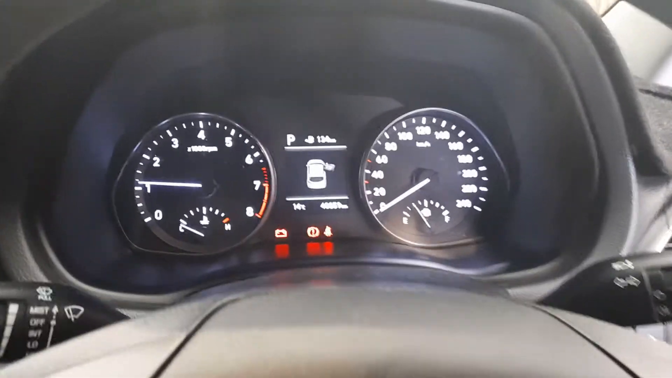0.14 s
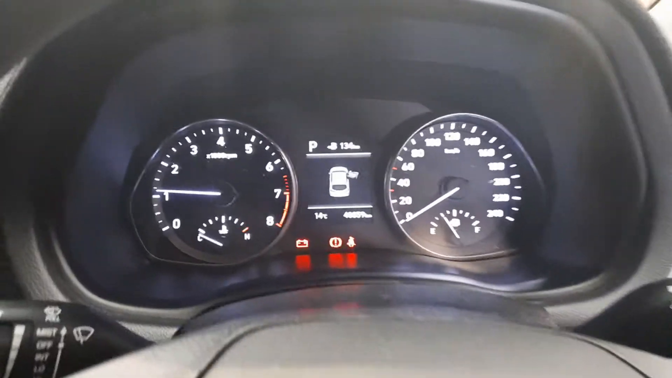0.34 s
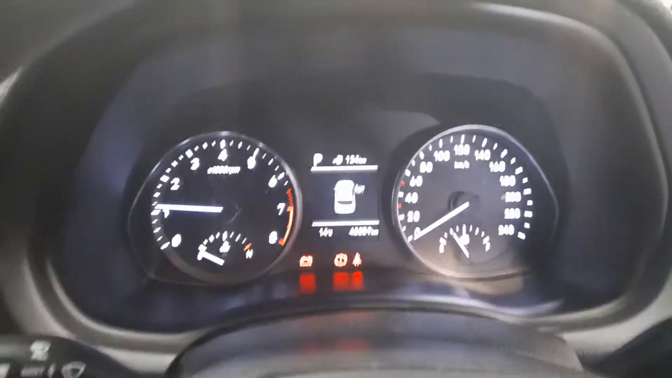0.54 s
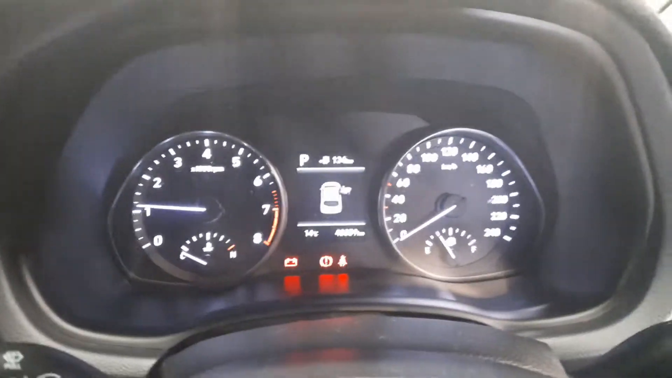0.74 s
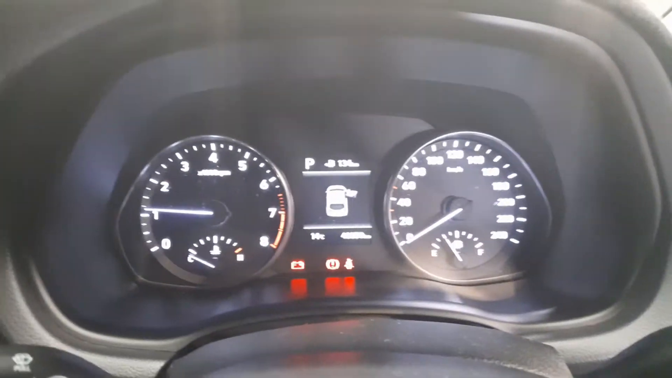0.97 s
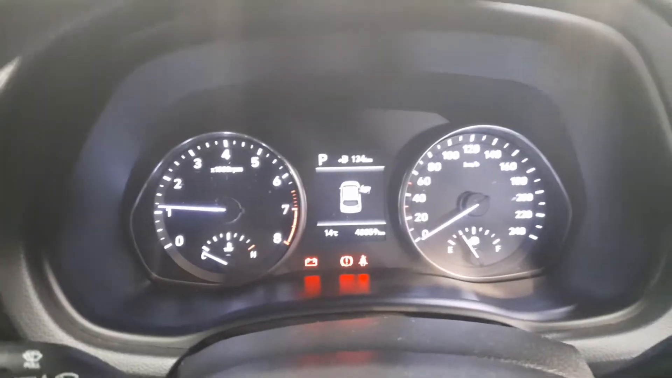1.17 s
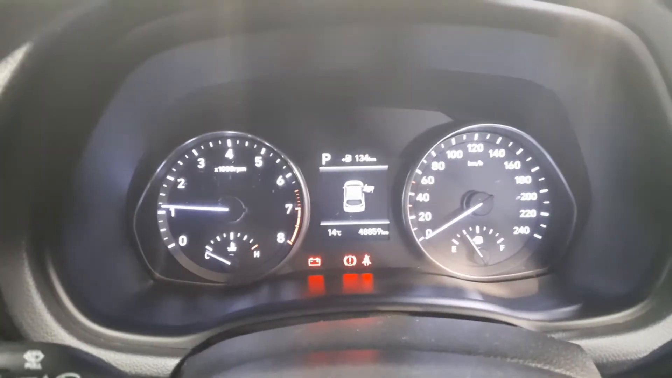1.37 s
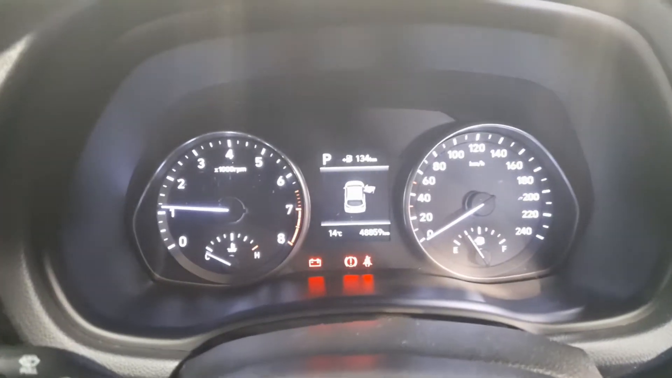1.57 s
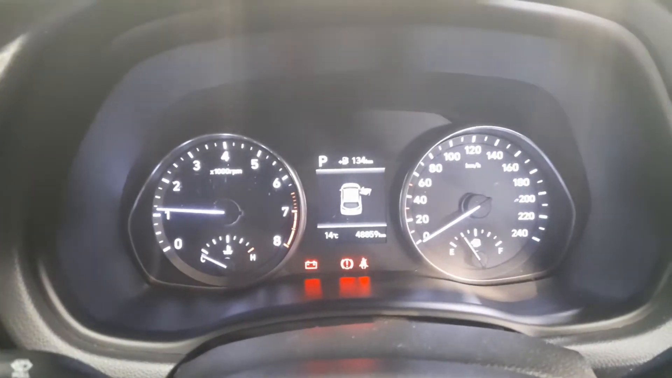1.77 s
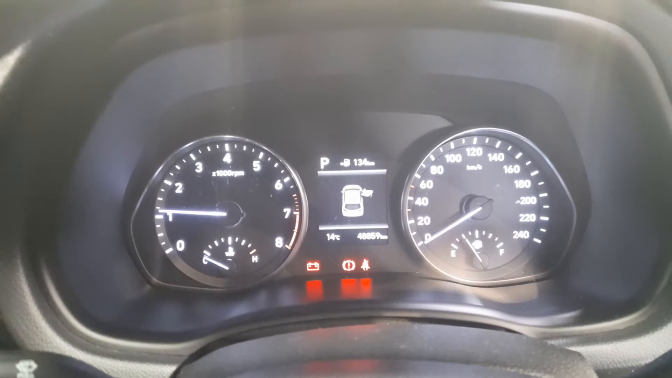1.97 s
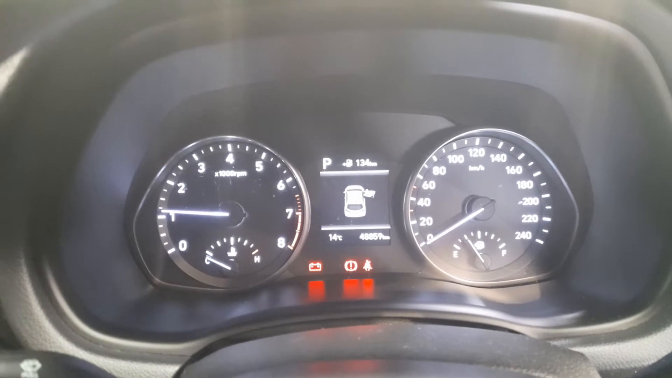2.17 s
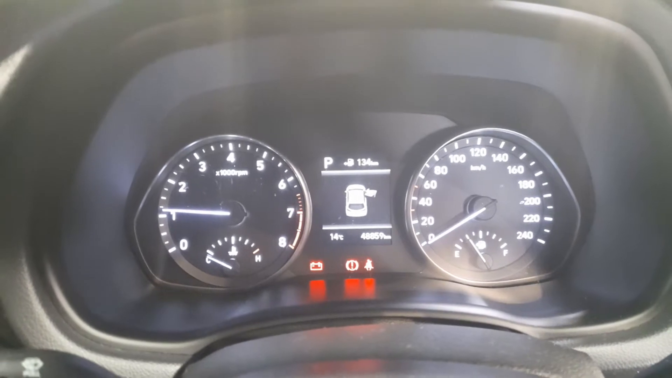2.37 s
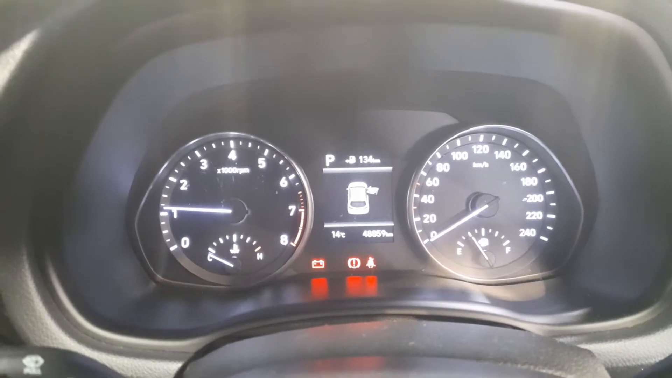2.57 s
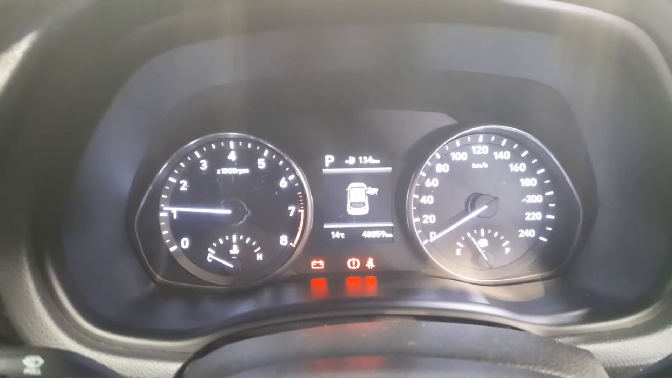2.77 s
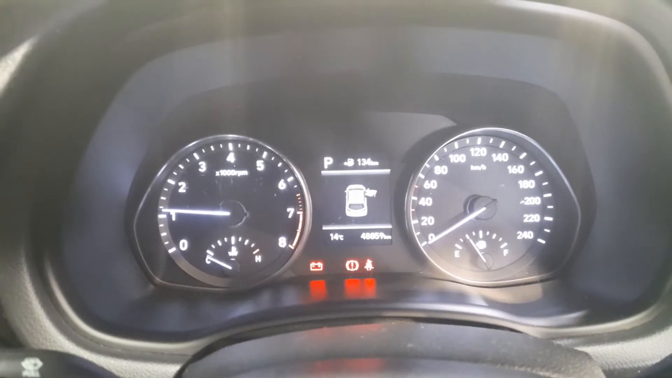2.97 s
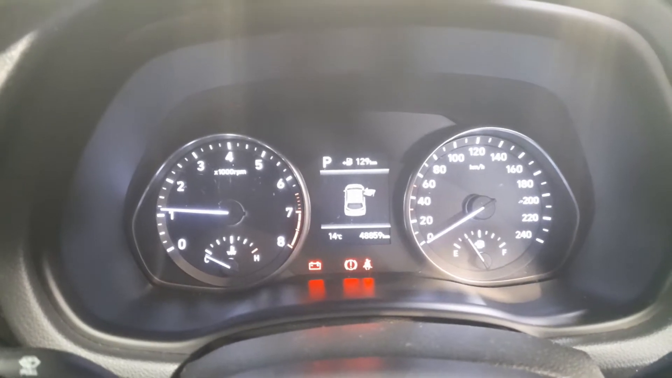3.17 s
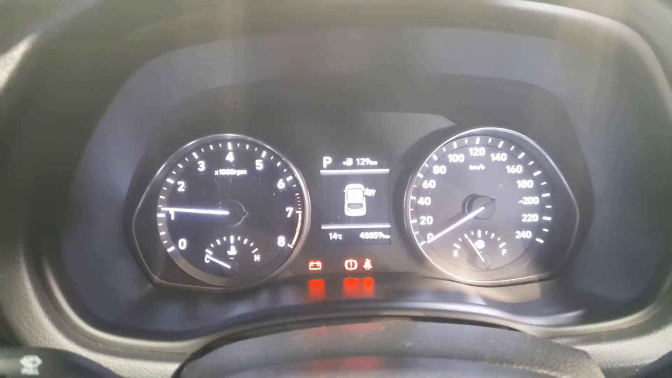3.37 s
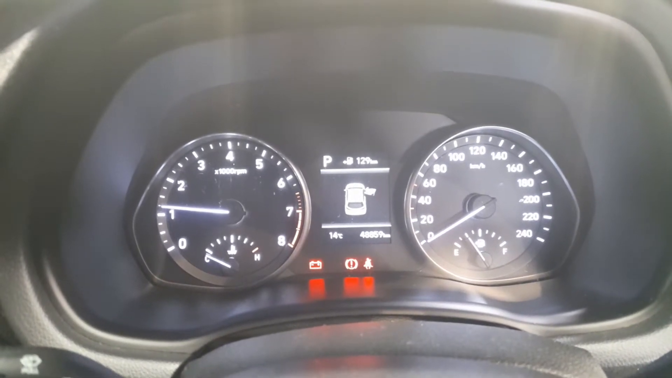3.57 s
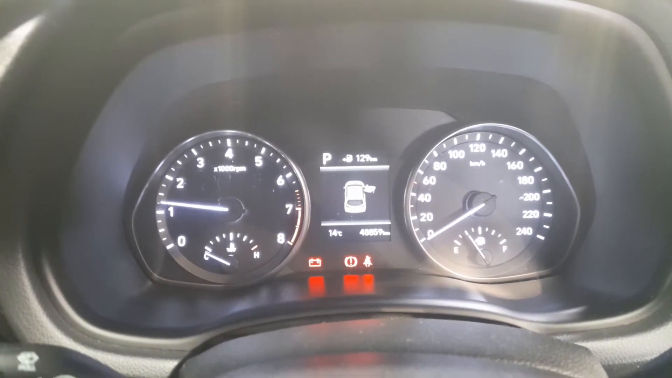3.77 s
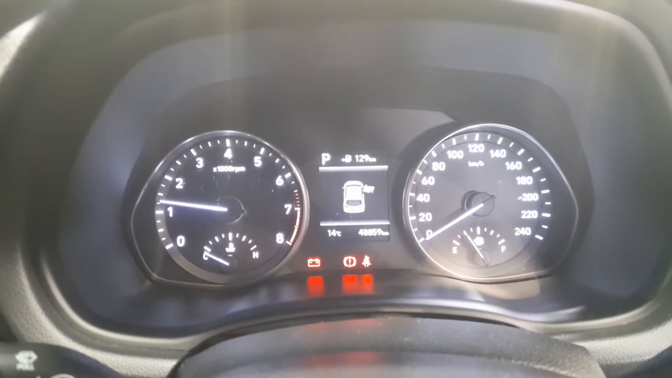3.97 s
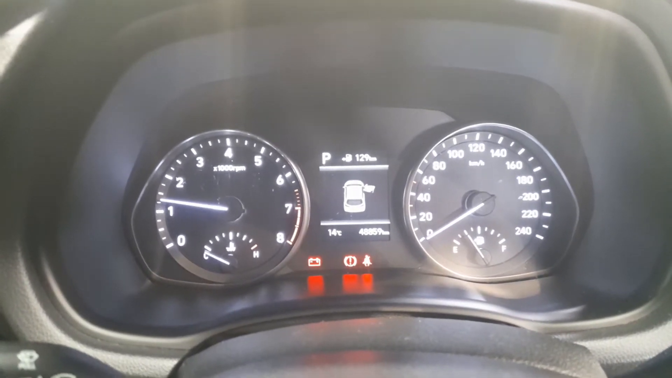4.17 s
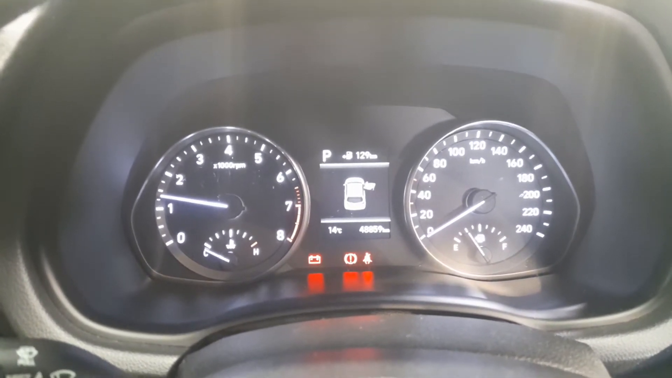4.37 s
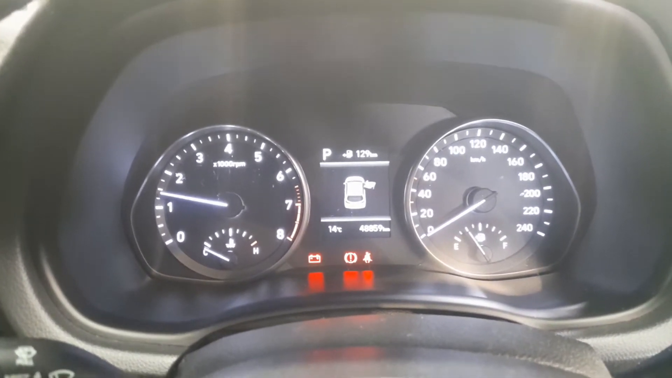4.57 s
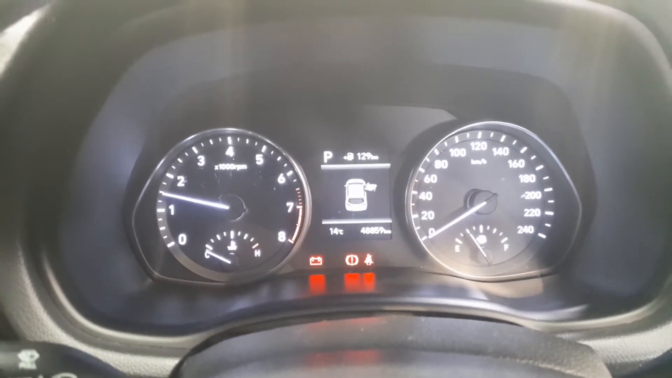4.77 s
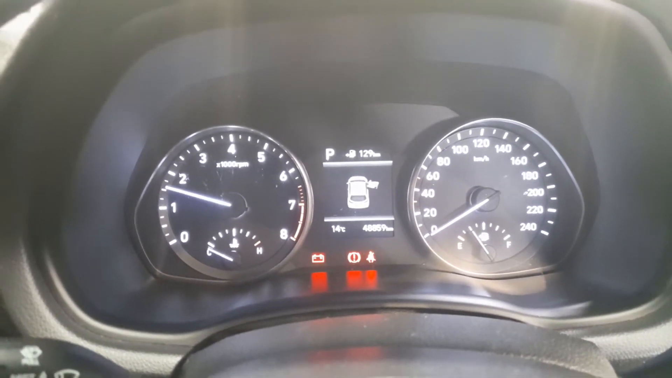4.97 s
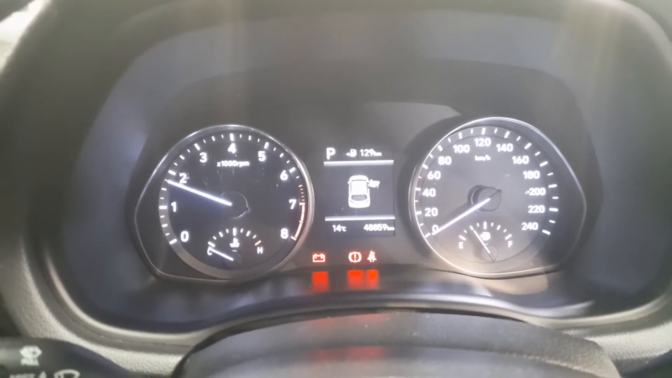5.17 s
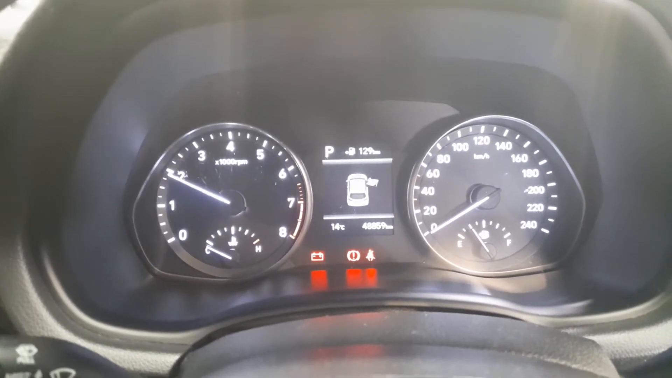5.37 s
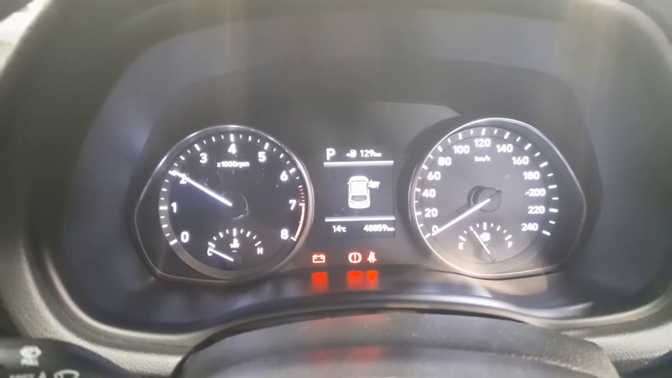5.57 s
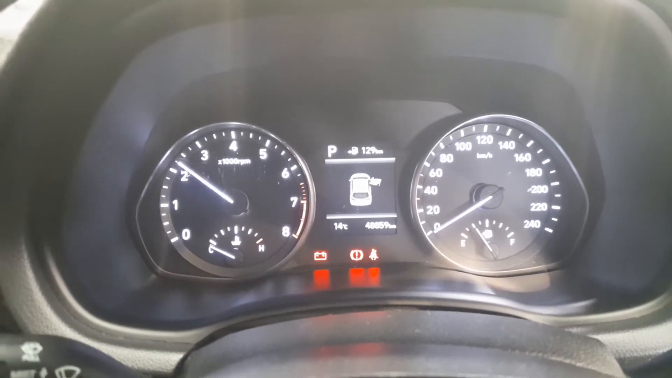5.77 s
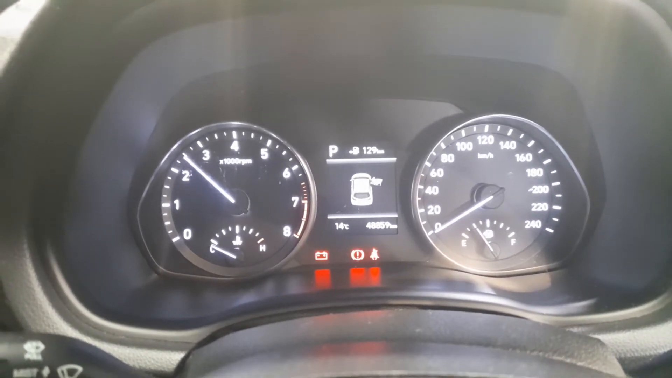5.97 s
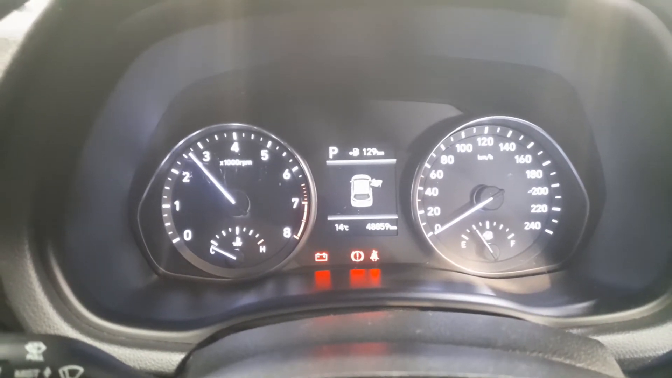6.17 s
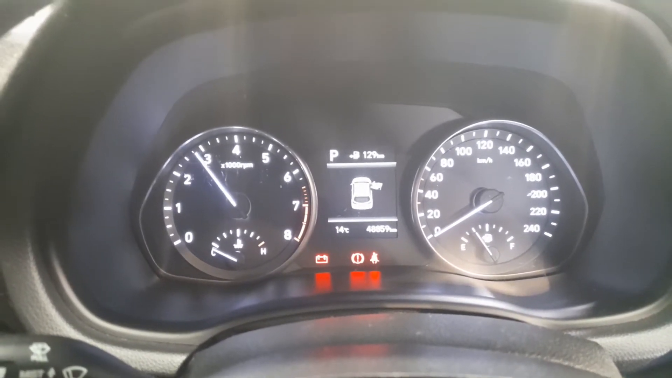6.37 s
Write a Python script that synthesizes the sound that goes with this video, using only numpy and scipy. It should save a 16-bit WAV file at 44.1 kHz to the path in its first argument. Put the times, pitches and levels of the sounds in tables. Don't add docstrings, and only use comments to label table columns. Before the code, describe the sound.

Heard inside a parked car's small, muffled cabin, a four-cylinder engine holds a low, steady fast idle with soft rumble, faint whine and light clatter. In the first second a hand shifts on the microphone, with dry ticks, dull knocks and a short rub. After three seconds the revs climb slowly, then faster, the boom swelling and rising in pitch, growl and clatter growing until it ends at high revs.

```python
import sys
import numpy as np
from scipy import signal
from scipy.fft import rfft, irfft
from scipy.io import wavfile
from scipy.ndimage import uniform_filter1d

SR = 44100
rng = np.random.default_rng(int(sys.argv[2]) if len(sys.argv) > 2 else 0)


def attenuation_scalar(level_db):
    decades = np.asarray(level_db, float) / 20
    return 10 ** decades


def inscribe(sig):
    pcm = np.round(np.clip(np.atleast_2d(sig).T, -1, 1) * 32767)
    wavfile.write(sys.argv[1], SR, pcm.astype(np.int16))


N = 283122


def rms_one(x):
    return x / np.sqrt(np.mean(x ** 2) + 1e-20)


def in_time(rows):
    times, *columns = np.transpose(rows)
    return [np.interp(np.arange(N) / SR, times, column) for column in columns]


def at_hz(points, hz):
    table_hz, value = np.array(points).T[:2]
    return np.interp(np.log(hz), np.log(table_hz), value)


def coloured(spectrum):
    return lambda hz: attenuation_scalar(at_hz(spectrum, hz)) * (hz > spectrum[0][0]) * (hz < spectrum[-1][0])


def lift_db(modes, hz):
    return sum(db / (1 + (2 * (hz - centre) / width) ** 2) for centre, width, db in modes)


def drift(rate):
    hop = 40
    pole = np.exp(-2 * np.pi * hop * rate / SR)
    noise = rng.standard_normal(N // hop + 2002)
    slow = signal.lfilter([1], [1, -2 * pole, pole * pole], noise)[2000:]
    return np.interp(np.arange(N) / hop, np.arange(len(slow)), rms_one(slow))


def at_ports(shape):
    # (frequency [Hz], common share of power)
    shared_power = [(60, 1), (120, 0.97), (250, 0.81), (500, 0.56), (800, 0.86), (1100, 0.68), (1400, 0.48),
                    (2500, 0.15), (5000, 0.11), (12000, 0.11)]
    # (frequency [Hz], left minus right [dB])
    side_balance = [(60, -7), (120, 4), (240, -4.5), (480, -6), (950, 1.5), (1890, -4.5), (3770, -9),
                    (7520, -7.5), (15000, -3)]
    lag_s = 0.00031
    hz = np.maximum(np.fft.rfftfreq(N, 1 / SR), 1)
    common, left, right = rfft(rng.standard_normal((3, N)))
    share = np.clip(at_hz(shared_power, hz), 0, 1)
    late = common * np.exp(-2j * np.pi * hz * lag_s)
    pair = np.sqrt(share) * np.array([late, common])
    pair += np.sqrt(1 - share) * np.array([left, right])
    balance = attenuation_scalar(np.outer([.5, -.5], at_hz(side_balance, hz)))
    pair = irfft(pair * shape(hz) * balance, N)
    return pair / np.sqrt(np.mean(pair.mean(axis=0) ** 2))


def air_hiss(load_db):
    # (frequency [Hz], density [dB per Hz])
    hiss_spectrum = [(7000, -20), (8200, -9.5), (9500, -2), (11500, 4.5), (14500, 4), (15750, 0)]
    return attenuation_scalar(-68 + 0.81 * load_db + 0.34 * drift(5.5)) * at_ports(coloured(hiss_spectrum))


def block_rumble(hz, load_db):
    # (frequency [Hz], density [dB per Hz])
    rumble_spectrum = [(28, -35), (45, -10), (70, -4.5), (110, 0.5), (150, -8), (200, -9.5), (250, -14),
                       (320, -5.5), (400, -11.5), (550, -12), (750, -10.5), (1000, -17)]
    thump = 1 + .15 * np.cos(2 * np.pi * np.cumsum(hz) / SR)
    return attenuation_scalar(-44.5 + 0.61 * load_db + 1.24 * drift(5.4)) * thump * at_ports(coloured(rumble_spectrum))


def valve_clatter(hz, clatter_db):
    # (frequency [Hz], density [dB per Hz])
    clatter_spectrum = [(400, -27), (600, -28), (750, -28), (1050, -7), (1400, -3.5), (2100, -6),
                        (2900, -10.5), (3300, -17.5), (4500, -19), (5400, -17), (6400, -21), (7200, -28),
                        (7900, -39), (9000, -41)]
    gate = 1 + .08 * np.sin(2 * np.pi * np.cumsum(hz) / SR)
    return attenuation_scalar(clatter_db + .3 * drift(12.0)) * gate * at_ports(coloured(clatter_spectrum))


def panel_group(rows, swing_db):
    def peaks(f):
        power = 0
        for centre, width, db in rows:
            power += attenuation_scalar(2 * db) / width / (1 + (2 * (f - centre) / width) ** 2) ** 1.41
        return np.sqrt(power)
    total_db = 10 * np.log10(sum(attenuation_scalar(2 * db) for centre, width, db in rows))
    return attenuation_scalar(total_db + swing_db + 1.0 * drift(3.0)) * at_ports(peaks)


def ringing_panels(hz, clatter_db):
    # (centre [Hz], width [Hz], level [dB])
    panel_modes = [(718, 61, -64), (901, 20, -65), (1262, 22, -66.5), (1351, 37, -56), (1608, 37, -58),
                   (1883, 35, -71), (2385, 31, -73), (2603, 40, -68), (2747, 48, -68), (2894, 91, -72),
                   (3576, 28, -75.5), (5250, 560, -71)]
    # (centre [Hz], width [Hz], lift [dB])
    panel_drive = [(44, 8.9, 2), (56.8, 6.9, -9.5), (74, 14, 4.5), (87, 6, -4)]
    driven = [row for row in panel_modes if 2000 < row[0] < 3200]
    others = [row for row in panel_modes if row not in driven]
    rise_db = clatter_db - clatter_db[0]
    out = panel_group(others, 0.45 * rise_db + lift_db(panel_drive, hz))
    return out + panel_group(driven, 1.63 * rise_db)


def finger_ticks():
    # (time [s], peak [dB], thinness [0-1])
    tick_events = [(.325, -40, 1), (0.331, -30.5, 0.1), (0.3364, -29.5, 0.04), (.3505, -39, .7),
                   (.428, -38, 0), (.5995, -40, 1), (.712, -43, .1), (0.7398, -42, 0.2), (0.7605, -39, 0.4),
                   (0.8035, -36, 0), (0.827, -36, 0), (0.8649, -40, .1), (.919, -45, 0), (1.0344, -31, .95)]
    out, t = np.zeros(N), np.arange(SR // 20) / SR
    thin = signal.butter(4, 11000, "high", fs=SR, output="sos")
    for s, db, thinness in tick_events:
        tick = attenuation_scalar(db - 3.0) * rng.standard_normal(len(t)) * np.exp(-t / 0.00072)
        tick += np.clip(thinness, 0, 1) * (signal.sosfilt(thin, tick) - tick)
        out[round(s * SR):][:len(t)] += tick
    return out


def casing_knocks():
    # (time [s], peak [dB], pitch [Hz], stiffening [ratio], decay [s])
    knock_events = [
        (0.63, -15, 296, 2.1, 0.004),
        (0.633, -23, 130, .3, 0.006),
        (0.722, -18.5, 131, 0.46, 0.0033),
        (0.759, -16, 140, 0.62, 0.0032),
    ]
    ways = [-1, -1, -1, 1]
    out, t = np.zeros(N), np.arange(SR // 20) / SR
    for (s, db, hz, stiffening, decay), way in zip(knock_events, ways):
        cycles = hz * (t + stiffening * 0.0011 * (1 - np.exp(-t / 0.0009)))
        envelope = np.exp(-t / decay) * (1 - np.exp(-t / .001))
        out[round(s * SR):][:len(t)] += way * attenuation_scalar(db) * np.sin(2 * np.pi * cycles) * envelope
    return out


def rub_envelope(start, hold, release, db):
    attack_s, low_db = 0.032, db - 15
    times = start + np.cumsum([-.01, .01, attack_s, hold, release, .01])
    return attenuation_scalar(in_time(list(zip(times, [-140, low_db, db, db, low_db, -140])))[0])


def hand():
    # (start [s], hold [s], release [s], level [dB])
    rub_events = [
        (0.6, 0.11, 0.11, -47.5),
        (3.77, 0.03, 0.067, -51.5),
    ]
    # (frequency [Hz], density [dB per Hz])
    casing_spectrum = [(1500, -27), (3000, -0.5), (5500, 3.5), (7000, 2.5), (8300, -9.5), (10000, -8),
                       (13000, -3), (15750, -3)]
    level = sum(rub_envelope(*row) for row in rub_events)
    scrape = level * attenuation_scalar(2.1 * drift(40.0)) * rng.standard_normal((2, N))
    hz = np.maximum(np.fft.rfftfreq(N, 1 / SR), 1)
    bright = irfft(rfft(finger_ticks() + scrape) * coloured(casing_spectrum)(hz), N)
    band = signal.butter(2, [90, 450], "band", fs=SR, output="sos")
    low = signal.sosfilt(band, rng.standard_normal((2, N)))
    shudder = attenuation_scalar(6.5) * level * (np.arange(N) < SR) * rms_one(low)
    return bright * attenuation_scalar([[-2.5], [2.5]]) + casing_knocks() * attenuation_scalar([[-5.0], [3.0]]) + shudder


def order(turns, multiple, db, flutter_db, wobble, in_step=False, haste=1):
    start = rng.random()
    phase = 2 * np.pi * (multiple * turns + (0 if in_step else start)) + wobble * drift(4.33 * haste)
    return -np.sqrt(2) * attenuation_scalar(db + flutter_db * drift(12.1)) * np.cos(phase)


def alternator(hz):
    # (centre [Hz], width [Hz], lift [dB])
    bracket_modes = [(478, 46, -10), (624, 70, -7), (677, 20, -5), (716, 30, 3), (750, 25, 4),
                     (804, 45, -3), (850, 40, -5), (900, 40, -4), (1040, 160, -28)]
    whine_hz = hz * (11.33 + .02 * (hz - hz[0]))
    wobble = .9 * (hz / hz[0]) ** 2
    level_db = -49 + lift_db(bracket_modes, whine_hz)
    return order(np.cumsum(whine_hz) / SR, 1, level_db, flutter_db=2.6, wobble=wobble)


def timing_chain(hz, turns):
    # (centre [Hz], width [Hz], lift [dB])
    cover_modes = [(2400, 90, 8), (2600, 80, 5), (2745, 50, 21)]
    links = 28.4
    level_db = -67.5 + lift_db(cover_modes, links * hz)
    return order(turns, links, level_db, flutter_db=1.2, wobble=1.5, haste=6)


def belt_pump(hz, turns):
    # (centre [Hz], width [Hz], lift [dB])
    pump_modes = [(637, 58, 9), (699, 54, 18), (760, 20, 4.5), (766, 45, 6.5), (860, 87, 11.5),
                  (915, 40, 6)]
    vanes = 10.6
    level_db = -63 + lift_db(pump_modes, vanes * hz)
    return order(turns, vanes, level_db, flutter_db=2.5, wobble=1.4, haste=4)


def uneven_growl(hz, turns, load_db):
    # (multiple of firing rate [ratio], level [dB])
    growl_orders = [(.75, -51), (1.25, -58.5), (1.5, -57.5), (2.5, -61), (2.75, -59.5), (3.5, -57.5),
                    (4.5, -58.5), (5, -58.5), (5.5, -56), (6, -60), (6.5, -64.5), (7.5, -67.5),
                    (9.5, -66.5), (3.57, -58.5)]
    # (centre [Hz], width [Hz], lift [dB])
    cabin_modes = [(118, 28, 6.5), (199, 9, 2.5), (238, 8, -0.5), (279, 15, -0.5), (315.4, 10, 6),
                   (374, 86, 4.5), (473, 22, 6), (516, 30, 2.5), (570, 30, -13), (706, 28, 12),
                   (913, 33, 17.5), (1080, 78, -18)]
    growl_db = 1 + 0.3 * load_db
    out = np.zeros(N)
    for k, db in growl_orders:
        level_db = db + growl_db + lift_db(cabin_modes, k * hz)
        out += order(turns, k, level_db, flutter_db=3.5, wobble=.8, haste=3)
    return out


def firing_multiples(hz, turns):
    # (multiple of firing rate [ratio], centre [Hz], width [Hz], lift [dB])
    mount_modes = [(2, 92, 1.8, 6), (2, 68, 2.7, 1), (2, 104.4, 9.2, 13.5), (2, 111.5, 6.1, 8.5),
                   (2, 130, 7.4, 5.5), (2, 142, 3.2, 10), (2, 157, 6, -9), (2, 174, 3.3, 8),
                   (2, 179, 3.7, -9), (2, 192, 14, 7), (3, 129.5, 3.1, 2.5), (3, 133, 6.6, 9.5),
                   (3, 144, 4.9, 5.5), (3, 189.7, 9.2, 9), (3, 262, 9.6, 8), (3, 279, 3.3, 6.5),
                   (3, 288, 11.5, 12), (4, 222, 16, 14), (4, 240, 18, 13), (4, 262, 8, 4),
                   (4, 310, 15, 8.5), (4, 368, 42, 11.5)]

    def passed(k, db):
        return db + lift_db([row[1:] for row in mount_modes if round(row[0]) == k], k * hz)
    out = order(turns, 2, passed(2, -44.5), flutter_db=1.6, wobble=.25, in_step=True)
    out += order(turns, 3, passed(3, -47.5), flutter_db=1.6, wobble=.3, in_step=True)
    return out + order(turns, 4, passed(4, -55), flutter_db=1.8, wobble=.3)


def firing_boom(hz, turns):
    # (centre [Hz], width [Hz], lift [dB])
    boom_modes = [(52.8, 13.4, 13.5), (54, 1.5, -5.5), (58.5, 1, -6), (61.4, 8.9, 6.5), (64.8, 1.1, -18),
                  (70, 1.7, -15.5), (71.05, 1.15, -12.5), (74, 15.7, 9.5), (79.8, 5.5, -4.5),
                  (90.9, 22.2, 14), (92.56, 3.2, -8.5), (97, 5, 1.5)]
    # (centre [Hz], width [Hz], left minus right [dB])
    boom_leans = [(77.4, 29, -2.5), (92.26, 2.8, 11), (97.6, 7.4, 2.5)]
    swell = uniform_filter1d(attenuation_scalar(-33 + lift_db(boom_modes, hz)), size=1300)
    boom = swell * order(turns, 1, 0, flutter_db=0.8, wobble=0.05, in_step=True)
    return boom * attenuation_scalar(np.outer([.5, -.5], -2 + lift_db(boom_leans, hz)))


def engine_tones(hz, load_db):
    turns = np.cumsum(hz) / SR
    upper = firing_multiples(hz, turns) + uneven_growl(hz, turns, load_db)
    upper += alternator(hz) + timing_chain(hz, turns) + belt_pump(hz, turns)
    late = np.roll(upper, round(0.00019 * SR))
    return firing_boom(hz, turns) + np.array([late, upper]) * attenuation_scalar([[-2.2], [2.2]])


def scene():
    # (time [s], firing rate [Hz], load over idle [dB])
    throttle = [(0, 37.4, -1), (1, 37.4, .6), (3.07, 37.5, -.6), (3.33, 39.2, 0), (3.59, 42.6, 1),
                (3.76, 43.7, 2), (4.05, 44.4, 2.5), (4.31, 45.9, 2), (4.58, 48.9, 1), (4.76, 51.9, .3),
                (4.86, 55.2, 1.2), (5.08, 59.6, 1.5), (5.4, 70.6, 4), (5.61, 75.4, 5), (5.79, 83.2, 6.3),
                (5.97, 89.2, 8.8), (6.2, 94.5, 10.5), (6.42, 97, 10.3)]
    hz, load_db = in_time(throttle)
    clatter_db = -50.5 + 0.9 * load_db
    block = air_hiss(load_db) + block_rumble(hz, load_db)
    block += valve_clatter(hz, clatter_db) + ringing_panels(hz, clatter_db)
    return block + hand() + engine_tones(hz, load_db)


def band_limit(x):
    return signal.sosfilt(signal.butter(12, 16520, fs=SR, output="sos"), x)


def record(dry):
    return band_limit(dry)


dry = scene()
out = record(dry)
inscribe(out)
```